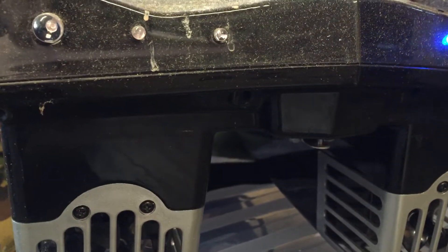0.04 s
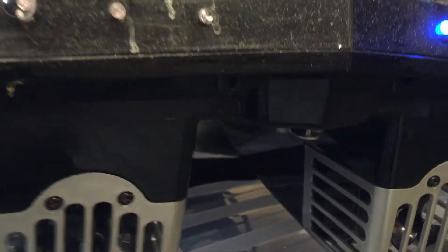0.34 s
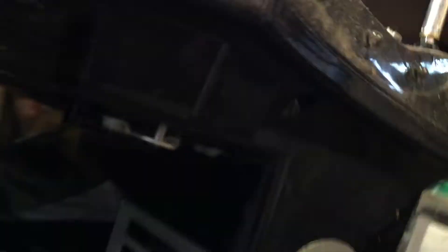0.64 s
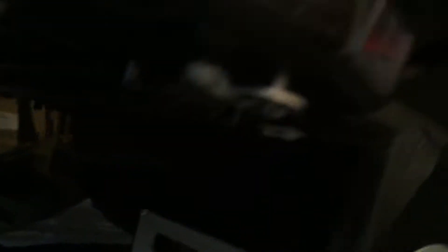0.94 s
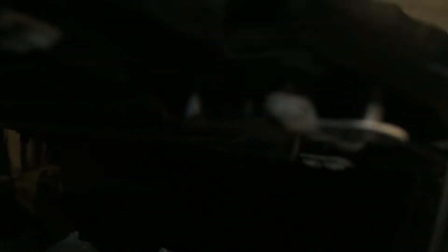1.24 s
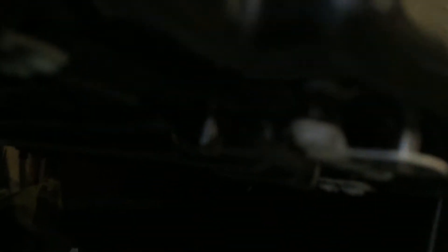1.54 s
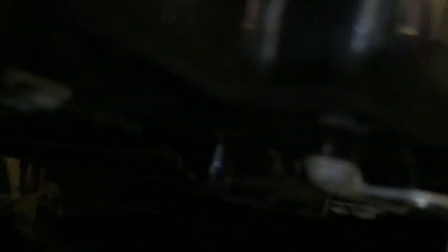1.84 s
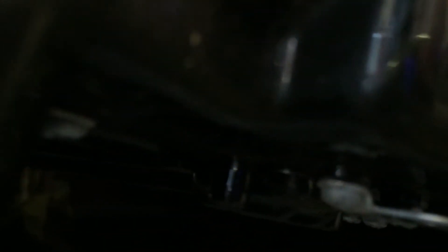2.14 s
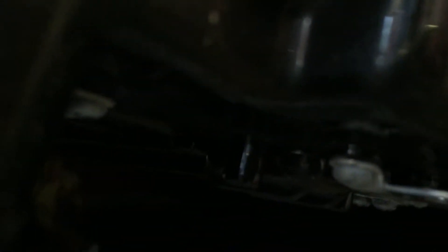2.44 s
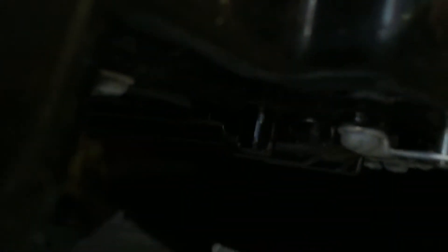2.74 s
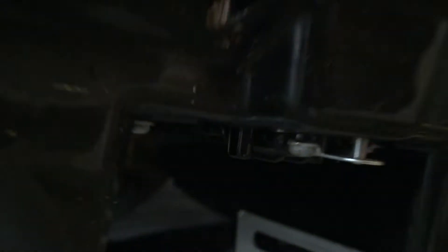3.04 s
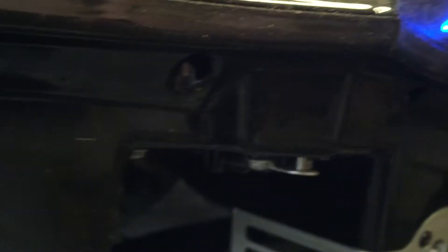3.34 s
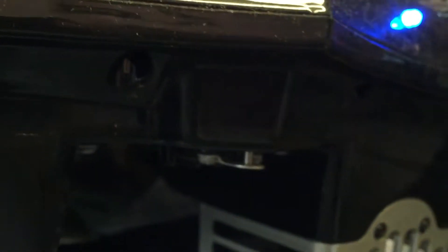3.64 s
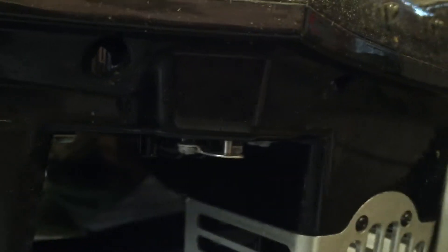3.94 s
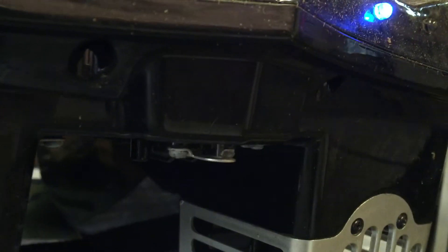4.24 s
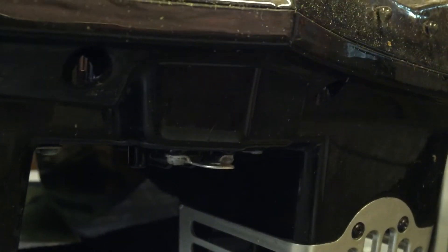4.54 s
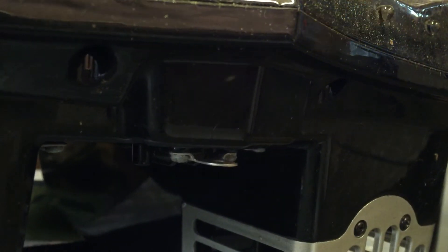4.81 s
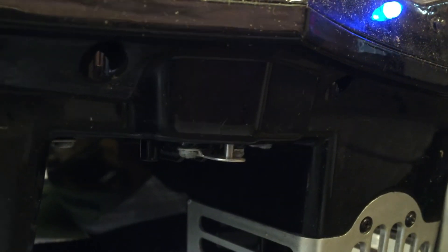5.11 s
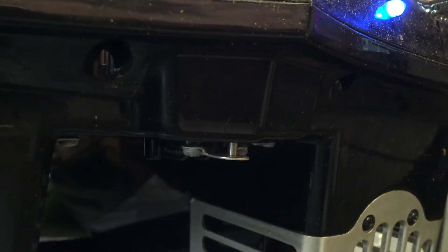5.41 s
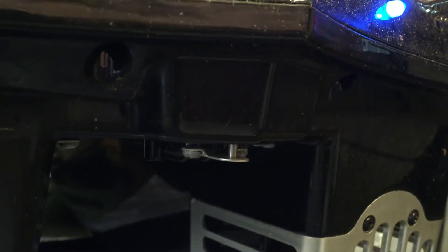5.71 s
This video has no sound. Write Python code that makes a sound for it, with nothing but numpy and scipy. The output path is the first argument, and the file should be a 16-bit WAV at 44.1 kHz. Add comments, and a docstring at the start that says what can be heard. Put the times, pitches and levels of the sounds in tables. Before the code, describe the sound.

A faint low hum with a slight whirr runs throughout in a small dry room. Right at the start, a loose lever clicks and the latch of a small remote-controlled boat snaps shut with a sharp, hollow plastic clack, very close. A sleeve brushes past softly at about 0.8 seconds, with a few tiny scrapes. The loudest clack comes at 1.9 seconds with a low thump, followed by a brief lever rattle at 2.3 and another clack at 2.6. Soft bumps of a hand on the hull follow between 2.8 and 4.2 seconds. A second pair of clacks lands at 4.3 and 5.2 seconds, with another short rattle between them at 4.8. Each clack has a tiny tick just before it, rings briefly in the hull and overloads the microphone. The hum dips for a moment after the two heaviest hits.

```python
"""Over a faint hum in a small dry room, the hopper latch of a small bait boat snaps to and fro, close by.
First its loose lever clicks and the latch slams into the front stop; a sleeve brushes past, with scrapes.
Four more throws follow, rear and front in turn, with soft bumps of a hand halfway through them.
Each throw ticks, then slams into the hollow plastic hull and overloads the microphone.
After each rear slam the hum sinks for a moment, and then the lever rattles to rest."""
import sys
import numpy as np
from scipy import signal
from scipy.fft import rfft, irfft
from scipy.io import wavfile
from scipy.ndimage import uniform_filter1d

SR = 44100
rng = np.random.default_rng(int(sys.argv[2]) if len(sys.argv) > 2 else 0)


def master(y):
    """Save y as 16-bit WAV."""
    cut = np.clip(np.atleast_2d(y).T, -1, 1)
    pcm = np.round(cut * 32767)  # scale
    wavfile.write(sys.argv[1], SR, pcm.astype(np.int16))


N = 263277

# The slams of the latch: start_s, stop_name, shell_db, hull_db, treble_db,
# push_db, push_lowest_hz, room_db, spring_db, slack_db
SLAMS = [(0.0831, "front", 22.5, -17.5, -6.5, -46, 54, -15, -56.5, -27),
         (1.8565, "rear", 33, -7.5, 0, 0.5, 58.06, -24.5, -48, -5),
         (2.5590, "front", 25, -13, 2.5, -28.5, 45.5, -32.5, -46.5, -12.5),
         (4.3341, "rear", 30, -8.5, 3, -9.5, 36.6, -16, -45, -9.5),
         (5.1557, "front", 23.5, -16.5, -0.5, -45, 55.76, -19, -61, -16)]
# Its two stops, by name: place (0 rear, 1 front), ring_factor, spring_hz, spring_ring_s, slack_treble_db
# A ring_s is the time to fade by 60 dB; a ring_factor multiplies that time for the shell and hull.
STOPS = {"rear": (0.091, .62, 450, 0.57, 3.5), "front": (1, 0.99, 415, 1.2, -6)}
# The crowded, quickly dying tones of the thin shell: pitch_hz, level_db_per_hz, ring_s
SHELL = [(147.74, -18.5, 0.11), (318, -21, 0.14), (520, -4, 0.069), (1010, -2, .058), (1390, 0, 0.078),
         (2130, -2, 0.015), (2490, -13, .04), (3000, -16, 0.078), (3760, -9.5, 0.032), (6350, -9.5, 0.027),
         (10140, -15, 0.031), (12900, -17, .024), (15300, -25, 0.02)]
# The echo of the room: pitch_hz, level_db_per_hz, ring_s
ROOM = [(150, -4, .2), (500, -2, .22), (1500, 1, .24), (3000, 0, .24), (6000, 0, .23), (10000, -1, .19),
        (15000, -2, .145)]


def amp(db):
    """Turn decibels into a factor to multiply by."""
    return 10 ** (np.asarray(db) / 20)


def evened(x):
    """Scale a signal to an average (rms) level of 1."""
    return x / np.sqrt(np.mean(x ** 2) + 1e-30)


def curve_at(points, hz):
    """Read a curve of (pitch_hz, value) points at any pitch."""
    pitches, values = np.transpose(points)
    return np.interp(np.log(hz + 1), np.log(pitches + 1), values)


def clock(size):
    """The time of each sample in seconds."""
    return np.arange(size) / SR


def add(mix, start_s, sound):
    """Mix a sound in at its start time."""
    part = mix[round(start_s * SR):][:len(sound)]
    part += sound[:len(part)]


def filtered(x, hz, kind, order=2):
    """Keep the lows, the highs or one band."""
    return signal.sosfilt(signal.butter(order, hz, kind, fs=SR, output="sos"), x)


def noise(colour):
    """Steady noise of level 1 with the given tone colour."""
    gains = amp(curve_at(colour, np.fft.rfftfreq(N, 1 / SR)))
    return evened(irfft(rfft(rng.standard_normal(N)) * gains, N))


def dense_ring(bands, swell_cycles, treble_db=0, size=10240):
    """Countless overlapping tones: each band builds up, then dies at its own speed."""
    t, hz = clock(size), np.fft.rfftfreq(size, 1 / SR)
    centres, out = np.transpose(bands)[0], np.zeros(size)
    for (centre, db, ring_s), pick in zip(bands, np.eye(len(bands))):
        share = curve_at(np.c_[centres, pick], hz) * (hz > centres[0] / 2)
        band = irfft(np.sqrt(share) * np.exp(2j * np.pi * rng.random(len(hz))))
        band *= amp(-60 * t / ring_s) * (1 - np.exp(-t * centre / swell_cycles))
        hardness = centre ** 2 / (centre ** 2 + 3500 ** 2)  # a harder contact lifts only the treble
        out += amp(db + treble_db * hardness) * np.sqrt(share.mean()) * band / np.linalg.norm(band)
    return out


def clear_ring(tones, swell_s):
    """Fading pure tones that first swell as the blow spreads through the part."""
    t = clock(8192)
    ring = sum((-1) ** k * amp(db - 60 * t / ring_s) * np.sin(2 * np.pi * hz * t)
               for k, (hz, db, ring_s) in enumerate(tones))
    return ring * (1 - np.exp(-t / swell_s))


def damped(tones, ring_factor):
    """A latch pressed home cuts the ringing short."""
    return [(hz, db, ring_s * ring_factor) for hz, db, ring_s in tones]


def in_room(x, room_db, delay_s=.007):
    """The direct sound plus the short echo of the room."""
    tail = np.r_[np.zeros(round(delay_s * SR)), dense_ring(ROOM, swell_cycles=3)]
    return x + amp(room_db) * signal.fftconvolve(x, tail)[:len(x)]


def room_wash(bands, treble_db, delay_s=.006):
    """Sound thrown in all directions comes back as a smooth wash of the same colour."""
    ring_times = [(hz, ring_s) for hz, _, ring_s in ROOM]
    echo_bands = [(hz, db, curve_at(ring_times, hz)) for hz, db, _ in bands]
    tail = dense_ring(echo_bands, swell_cycles=3, treble_db=treble_db)
    return np.r_[np.zeros(round(delay_s * SR)), tail]


def hum_dips(fall_s=.086, recover_s=.1):
    """The background's change in dB: it falls, stays low and recovers."""
    # Dips at the two heaviest slams: start_s, length_s, depth_db
    dips = [(1.815, 0.512, -10), (4.33, .17, -11)]
    t = clock(N)
    return sum(db * np.clip(np.minimum((t - s) / fall_s, 1 - (t - s - length_s) / recover_s), 0, 1)
               for s, length_s, db in dips)


def background():
    """A low hum and a whirr near 1 kHz, each wavering on its own; the thin hiss above sinks less."""
    # The tone colour of the background: pitch_hz, level_db_per_hz
    colour = [(20, -26.5), (45, -11), (70, 1.5), (108, 0), (150, -13.5), (205, -13), (300, -22.5),
              (550, -26), (760, -24), (960, -14.5), (1400, -27.5), (2200, -34), (7000, -39.5), (11000, -45),
              (15500, -43.5)]
    steady = amp(-58) * noise(colour)
    hum, body = (signal.sosfiltfilt(signal.butter(2, hz, fs=SR, output="sos"), steady)
                 for hz in (400, 1600))
    whirr, hiss = body - hum, steady - body
    hum_db, whirr_db = (1.7 * evened(filtered(rng.standard_normal(N), 9, "lowpass")) for _ in range(2))
    dip_db = hum_dips()
    return amp(dip_db) * (hum * amp(hum_db) + whirr * amp(whirr_db)) + hiss * amp(.5 * dip_db)


def sleeve(peak_s=.8, rise_db_per_s=67, fall_db_per_s=20, snags_per_s=45, snag_s=.0015):
    """Rubbing cloth swells and fades, with tiny snaps as fibres catch and let go."""
    # The tone colour of the cloth: pitch_hz, level_db_per_hz
    colour = [(500, -22), (1500, -2.5), (2500, -2), (4200, -3.5), (7000, -12), (15000, -23)]
    t = clock(N) - peak_s
    level_db = -67 + np.minimum(rise_db_per_s * t, -fall_db_per_s * t)
    grain_db = 2.2 * evened(uniform_filter1d(rng.standard_normal(N), size=400))
    catches = (rng.random(N) < snags_per_s / SR) * np.minimum(rng.exponential(1, N), 2)
    snags = signal.oaconvolve(catches, np.exp(-clock(1024) / snag_s))[:N]
    return amp(level_db) * evened(noise(colour) * (amp(grain_db) + amp(3.5) * snags))


def scuff(band_hz, length_s, size=12000):
    """A quick swell of rubbing noise that peaks at half of length_s, then trails off."""
    age = 2 * clock(size) / length_s
    return evened(filtered(rng.standard_normal(size), band_hz, "bandpass")) * age * np.exp(1 - age)


def handling(bump_s=.023, thud_hz=(247, 440), rub_hz=1939, fizz_hz=(7000, 13000)):
    """A hand on the hull: a bump is a thud with a rub, a scrape is a band of noise with a fizz."""
    # Soft bumps: start_s, thud_db, rub_db
    bumps = [(2.762, -51, -76), (3.223, -56.5, -67), (3.652, -60, -75), (3.715, -54, -60),
             (3.982, -54, -63.5), (4.199, -52, -75)]
    # Small dry scrapes: start_s, level_db, pitch_hz, length_s
    scrapes = [(0.801, -46, 2400, 0.0044), (1.021, -59.5, 3280, 0.0069), (1.133, -56.5, 4280, 0.0011),
               (1.537, -69, 5200, 0.012), (3.224, -51.5, 5064, .018), (4.198, -70, 5180, 0.024),
               (4.596, -66.5, 4505, 0.012)]
    out = np.zeros(N)
    around = np.array([1 / 1.3, 1.3])  # band edges below and above a pitch
    for s, thud_db, rub_db in bumps:
        add(out, s, amp(thud_db) * scuff(thud_hz, bump_s) + amp(rub_db) * scuff(rub_hz * around, bump_s))
    for s, db, hz, length_s in scrapes:
        fizz_db = 25 * np.log2(hz / 4777)  # a higher scrape fizzes more
        add(out, s, amp(db) * (scuff(hz * around, length_s) + amp(fizz_db) * scuff(fizz_hz, length_s)))
    return in_room(out, room_db=-9)


def lever_bounces(gap_shrink=.78, fade_db=-2.5, dulling_db=-2.5):
    """The loose lever bounces ever faster, softer and duller. Gives start_s, level_db, treble_db."""
    # Drops of the lever: start_s, level_db, treble_db, first_gap_s, length_s
    drops = [(0.052, -3, -10.5, .017, .024), (1.307, -18, -17, .02, .01), (2.262, -2, -6, .0261, .095),
             (4.849, 0.5, -5, 0.027, .11)]
    rows = []
    for s, db, treble_db, gap_s, length_s in drops:
        delays = np.r_[0, np.cumsum(gap_s * gap_shrink ** np.arange(5))]
        rows += [(s + delay, db + k * fade_db, treble_db + k * dulling_db)
                 for k, delay in enumerate(delays) if delay < length_s]
    return rows


def lever():
    """Each bounce is a click with a short hollow ring; the room's wash fills the gaps."""
    # The crowded tones of the lever's click: pitch_hz, level_db_per_hz, ring_s
    click_bands = [(450, -15, 0.04), (760, -20.5, 0.02), (1300, -2, 0.023), (1750, -8, 0.026),
                   (2400, -3, .023), (2830, -8, 0.028), (4440, -14.5, .024), (7490, -25.5, .03),
                   (9000, -22, .03), (13920, -33, .03)]
    # The tones of its hollow ring: pitch_hz, level_db, ring_s
    hollow_tones = [(1380, -3.5, 0.017), (1260, 2.5, 0.03), (2420, -2.5, 0.065), (2431, -3.5, .03)]
    out = np.zeros(N)
    ring = amp(-34) * in_room(clear_ring(hollow_tones, swell_s=.0011), room_db=-17)
    for s, db, treble_db in lever_bounces():
        click = dense_ring(click_bands, swell_cycles=2.5, treble_db=treble_db, size=4096)
        add(out, s, amp(db + 1.5) * click)
        add(out, s, amp(db - 8) * room_wash(click_bands, treble_db))
        add(out, s, amp(db) * ring)
    return out


def hull_ring(place, ring_factor):
    """The place of the blow (0 rear, 1 front) decides how strongly each tone of the hull answers."""
    # The strongest tones of the hull and latch: pitch_hz, rear_db, front_db, ring_s
    hull_tones = [(216.73, -23, -18, 0.039), (401, -24.5, -12.5, 0.097), (457, -8.5, -3.5, 0.11),
                  (493.6, -1, 2, 0.11), (572, -3.5, -15.5, 0.098), (672, -5, -3.5, 0.09),
                  (840, 1.5, -7, 0.048), (987, -8, -5, 0.098), (1030, 0.5, -2.5, 0.1),
                  (1135, -14.5, -10, 0.07), (1337, 0, -7.5, .085), (1414, -5, -9.5, 0.11),
                  (1454, -14.5, -10.5, .10), (1687, -12.5, -11, 0.082), (1779, -3.5, -12.5, 0.057),
                  (1955, -6.5, -6, 0.082), (2050, -18, -5.5, 0.064), (2160, -6, -4, 0.062),
                  (2292, -16, -9, .08), (2727, -15.5, -11, 0.077), (3430, -34, -33, 0.25),
                  (3496, -13, 3, 0.048), (3717, -14.5, -21, 0.053), (3846, -10.5, -21.5, 0.076),
                  (4160, -13, -25, 0.11), (4600, -14, -18, 0.034), (5760, -16, -14, 0.03),
                  (6200, -6.5, -10, 0.042)]
    tones = [(hz, (1 - place) * rear_db + place * front_db, ring_s)
             for hz, rear_db, front_db, ring_s in hull_tones]
    return clear_ring(damped(tones, ring_factor), swell_s=.0017)


def latch_contacts(lead_s=.023, catch_s=.0096, rebound_s=.0177, rebound_gap_s=.0098):
    """The light contacts around each slam. Gives start_s, level_db, treble_db, ring_factor."""
    rows = []
    for s, stop, shell_db, _, treble_db, *_, slack_db in SLAMS:
        *_, slack_treble_db = STOPS[stop]
        # The latch takes up its slack: ticks come ever closer, louder and duller.
        rows += [(s - lead_s * .49 ** k, slack_db + 3.5 * k, slack_treble_db - 10 * k, .62)
                 for k in range(3)]
        if stop == "front":
            # The catch clicks home, then the latch rebounds in dull, fading knocks.
            rows += [(s + catch_s, shell_db - 18, treble_db + 5.5, .66)]
            rows += [(s + rebound_s + k * rebound_gap_s, shell_db - 6 - 5 * k, treble_db - 24.5, .73)
                     for k in range(3)]
    return rows


def latch_ticks():
    """Each light contact rings the thin shell, and the hull a little."""
    out = np.zeros(N)
    for s, db, treble_db, ring_factor in latch_contacts():
        tick = dense_ring(damped(SHELL, ring_factor), swell_cycles=.82, treble_db=treble_db, size=4096)
        add(out, s, amp(db) * tick)
        add(out, s, amp(db - 42) * hull_ring(1, ring_factor))
    return in_room(out, room_db=-16)


def air_push(low_hz, high_hz=305):
    """The hull wall shoves the air once: a thump whose deepest part comes last."""
    push = filtered(signal.unit_impulse(16384), low_hz, "highpass", order=4)
    push = filtered(push, high_hz, "lowpass", order=3)
    return push / abs(push).max()


def spring(hz, ring_s):
    """The return spring sings on in one fading tone."""
    t = clock(SR)
    return amp(-60 * t / ring_s) * np.sin(2 * np.pi * hz * t)


def latch_slams():
    """The latch hits a stop: the shell cracks, the hull rings and thumps, the spring sings."""
    out = np.zeros(N)
    for s, stop, shell_db, hull_db, treble_db, push_db, push_hz, room_db, spring_db, _ in SLAMS:
        place, ring_factor, spring_hz, spring_ring_s, _ = STOPS[stop]
        crack = dense_ring(damped(SHELL, ring_factor), swell_cycles=.41, treble_db=treble_db, size=4096)
        add(out, s, amp(shell_db) * crack)
        add(out, s, amp(shell_db + room_db) * room_wash(SHELL, treble_db))
        add(out, s, amp(hull_db) * in_room(hull_ring(place, ring_factor), room_db=-22.5))
        add(out, s, amp(push_db) * air_push(push_hz))
        add(out, s, amp(spring_db) * spring(spring_hz, spring_ring_s))  # higher when stretched
    return out


def scene():
    """Latch, lever and hand in one small room, in one channel."""
    return (latch_slams() + latch_ticks() + lever() + handling() + sleeve() + background())[None]


def record(dry, ceiling=.61, top_hz=15400):
    """The microphone overloads on the slams; then the highest treble is cut."""
    clipped = dry / (1 + (dry / ceiling) ** 8) ** (1 / 8)
    treble_cut = signal.firwin(127, top_hz, window=("kaiser", 9), fs=SR)
    return signal.oaconvolve(clipped, treble_cut[None], "same")


dry = scene()
out = record(dry)
master(out)
```